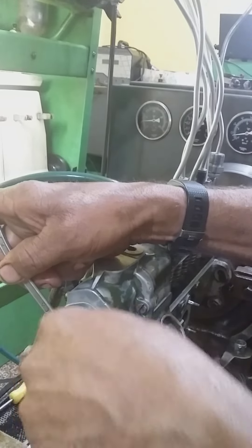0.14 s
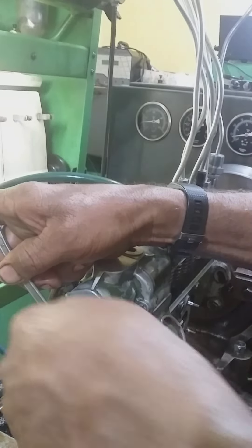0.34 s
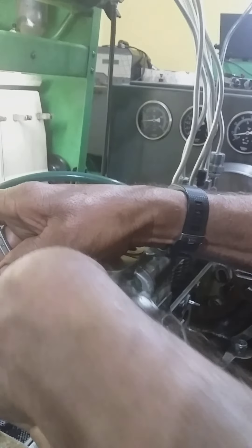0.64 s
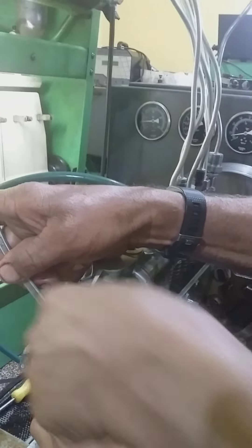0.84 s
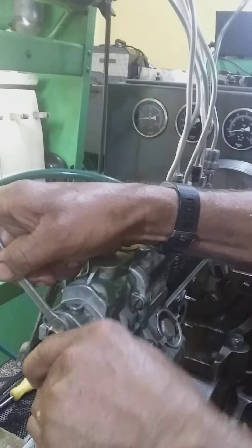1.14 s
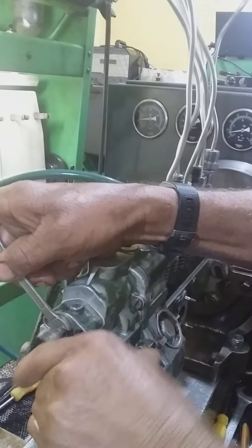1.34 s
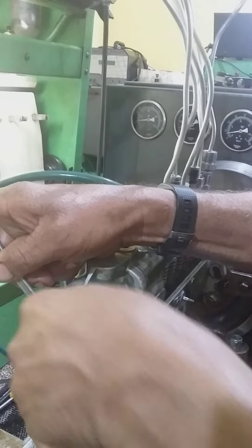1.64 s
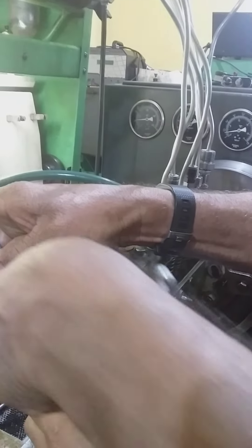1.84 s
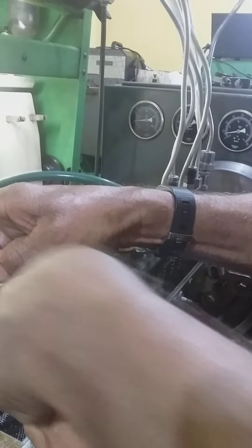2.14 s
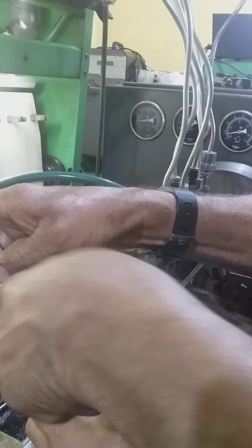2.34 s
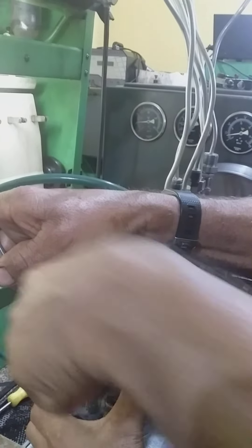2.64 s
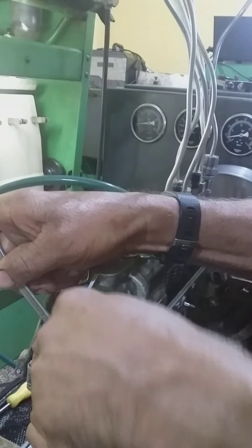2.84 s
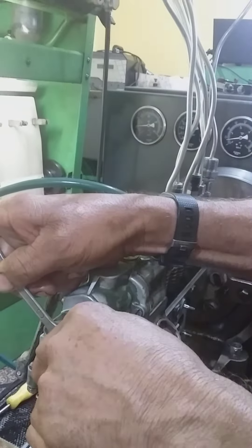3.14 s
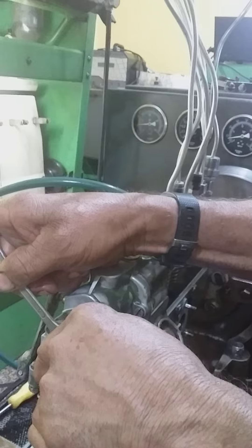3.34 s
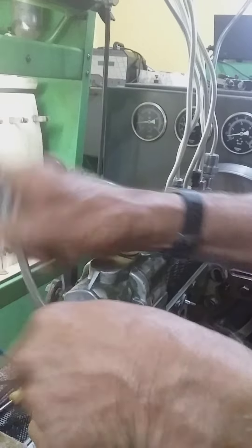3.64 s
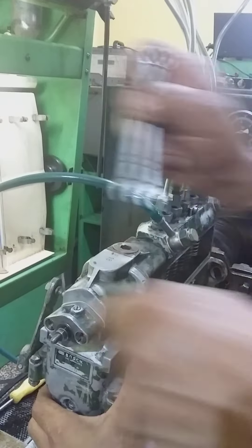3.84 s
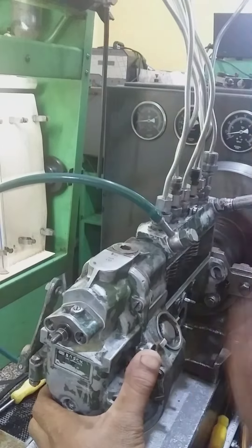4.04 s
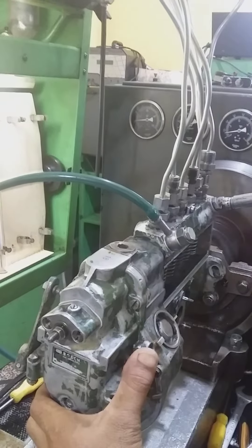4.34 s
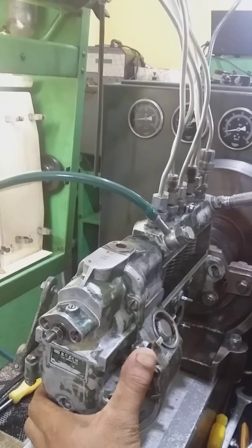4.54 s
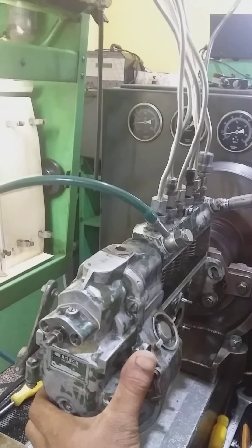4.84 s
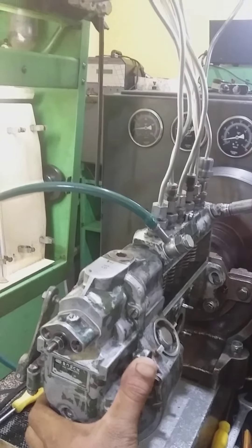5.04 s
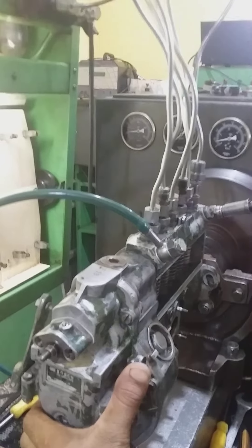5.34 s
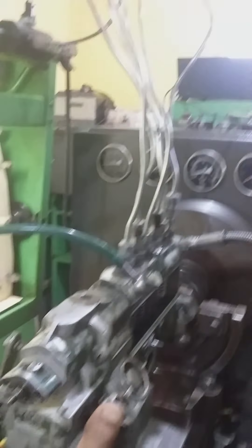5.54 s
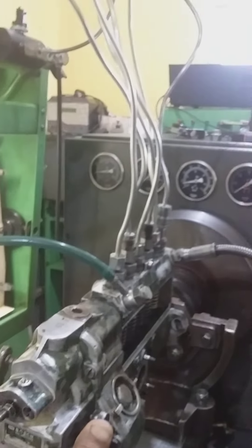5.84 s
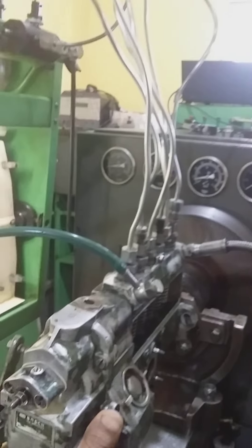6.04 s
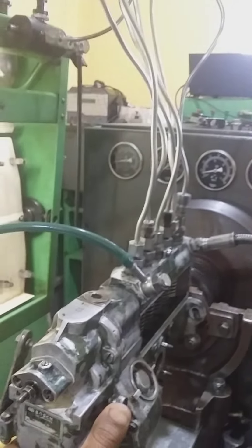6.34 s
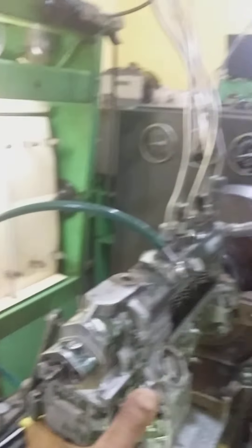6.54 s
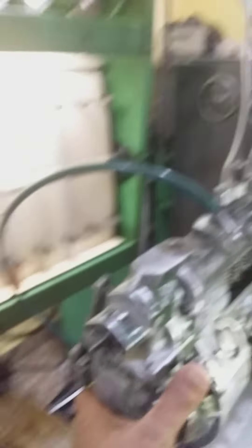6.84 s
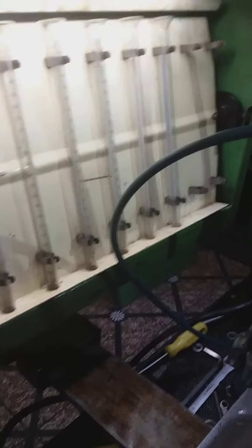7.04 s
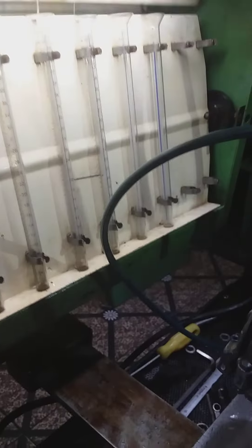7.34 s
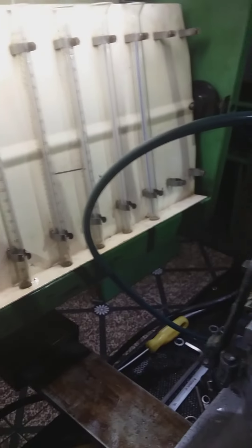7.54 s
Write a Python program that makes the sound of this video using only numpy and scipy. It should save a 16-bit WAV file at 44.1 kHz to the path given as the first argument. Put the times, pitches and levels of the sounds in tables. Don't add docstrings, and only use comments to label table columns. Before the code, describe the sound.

In a workshop, a fuel injection pump runs close to the microphone on a steel bench. A low booming hum carries rumble, fast plunger clatter and bright hiss. Every second or so the drive sags in pitch and recovers. Just past halfway a spanner lands with a sharp clank, thud and short high ringing. The clatter recedes slightly, returns, cuts to silence for an instant, then resumes to the end.

```python
import sys
import numpy as np
from scipy import signal
from scipy.io import wavfile
from scipy.ndimage import uniform_filter1d

SR = 44100
rng = np.random.default_rng(int(sys.argv[2]) if len(sys.argv) > 2 else 0)


def linear_from_db(decibels):
    return 10 ** (np.asarray(decibels, float) / 20)


def file_out(sig):
    cols = np.atleast_2d(sig).T
    lim = np.clip(cols, -1, 1)
    pcm = np.round(lim * 32767).astype(np.int16)
    wavfile.write(sys.argv[1], SR, pcm)


N = 338688
T = np.arange(N) / SR

# multiple, level_db
INJECTION_ORDERS = [(1, -26.5), (2, 0), (3, -14.5), (4, -10.5), (5, -10.5), (6, -40), (7, -24.5), (8, -19),
                    (9, -19), (10, -14.5), (11, -16), (12, -29), (13, -20.5), (14, -24.5)]
# pitch_hz, level_db (per Hz)
BENCH_RUMBLE = [(18, -66), (30, -38), (60, -29), (100, -34), (114, -14), (150, -8), (180, -6), (215, -6),
                (278, -13), (340, -13), (402, -10), (520, -26), (700, -26), (1000, -50)]
# pitch_hz, level_db (per Hz)
HOUSING_COLOUR = [(260, -44.0), (450, -5.0), (579, -11.5), (801, -0.5), (971, -6.5), (1130, -1.5),
                  (1300, -3.5), (2220, -2), (2430, 3.0), (2980, -4.5), (5890, -1), (9050, -3.5),
                  (11600, -1), (15400, -19)][:-1] + [(17000, -3)]
HOUSING_RING_HZ = (799, 1055, 1150, 1400, 1820, 2480, 4200, 5435, 5725, 5955, 5900, 10300, 11380, 11680)
# width_hz, level_db
HOUSING_RING_SHAPE = [(20.4, -8.5), (40, 5.5), (131, 0.5), (30, 1.5), (250, 3.5), (250, -3), (600, 4.5),
                      (29, 4), (29.8, 1), (35, 6), (696, 4), (245, 3.5), (250, 5), (297, 8.5)]
# spurt_db, late_strokes, knock_db, knock_ring_hz, tick_db
PLUNGER_HABITS = [
    (0.5, 0.008, -3, 2520, -2.5),
    (-17.5, .02, -0.5, 1147, 0),
    (3, 0.025, -3.5, 2050, 4),
    (-2, 0.015, -3.5, 1180, -24),
    (-22, 0.0069, -2.5, 1930, 0.5),
    (-11, 0.015, -2.5, 2400, -6),
]
# start_s, sink_s, held_s, hum_sag_hz
DRIVE_LOADS = [
    (-0.189, 0.122, 0.07, 5.82),
    (0.45, 0.235, 0.008, 18.932),
    (1.524, 0.399, -0.002, 5.983),
    (2.393, 0.222, 0.276, 3.477),
    (3.22, 0.257, -0.002, 18.988),
    (4.49, 0.02, 0.17, 6.8),
    (5.2, 0.095, 0.353, 3.981),
    (6.034, 0.169, 0.065, 17.651),
    (7.192, 0.361, -0.0, 7.001),
]
# pitch_hz, width_hz, level_db, phase_rad
BENCH_PANELS = [
    (162.9, 3.73, 1, 3),
    (147, 2.6, -7, -2),
]
SPANNER_LOW_HZ = dict(a=4613, b=6315, c=7276, d=7604, e=8025, f=10266, g=10307, h=11391, i=11620, j=11763)
SPANNER_HIGH_HZ = dict(k=12188, l=12290, m=12823, n=12974, o=13215, p=13624, q=14316, r=15181)
# start_s, mode, level_db, contact_s
SPANNER_RINGS = [(4.083, "i", -34, .006), (4.093, "m", -27, .006), (4.098, "j", -25, .013),
                 (4.503, "p", -26, .012), (4.503, "h", -21, .01), (4.503, "f", -26, .02),
                 (4.503, "k", -25, .01), (4.503, "n", -25, .01), (4.503, "r", -28, .011),
                 (4.522, "q", -27, .006), (4.518, "e", -24, .022), (4.512, "d", -30.5, .085),
                 (4.518, "c", -32.5, .033), (4.522, "b", -23, .005), (4.536, "j", -27, .012),
                 (4.550, "j", -21, .055), (4.555, "e", -28, .012), (4.560, "f", -32.5, .02),
                 (4.572, "o", -21, .022), (4.598, "o", -29, .1), (4.538, "p", -25, .09),
                 (4.646, "p", -29, .04), (4.565, "m", -34, .13), (4.560, "a", -31, .08),
                 (4.575, "q", -39, .055), (4.597, "c", -30, .027), (4.610, "l", -33, .08),
                 (4.624, "g", -18, .034), (4.686, "g", -33, .01), (4.672, "j", -28, .028)]
# start_s, click_db, thud_db, thud_top_hz, length_s
BENCH_BUMPS = [
    (0.398, -60, -32, 123, 0.069),
    (3.218, -60, -45, 60, .08),
    (4.505, -36, -24.5, 500, .012),
    (4.529, -22, -31, 900, 0.011),
    (4.52, -60, -19.5, 140, 0.024),
    (4.54, -35, -17.5, 1290, 0.0054),
    (4.559, -36, -33, 1000, .008),
    (4.605, -24, -40, 400, 0.012),
    (6.50, -52, -41, 60, .06),
    (7.615, -54, -54, 90, 0.05),
]
# start_s, clatter_db
MIC_NEARNESS = [(0.0, -19.5), (0.36, -19.5), (0.6, -20.5), (1.91, -21), (3.16, -19.5), (3.47, -19.5),
                (3.88, -20), (4.3, -19), (4.75, -23.5), (5.34, -27), (5.76, -25), (6.04, -21), (6.8, -20)]
# start_s, end_s
SILENT_GAP = (6.9635, 7.0815)

FREE_HZ = 163.49
CATCH_S, SETTLE_HZ, SETTLE_S = .183, 9.8, .193
JUMP_S = 4.499
AFTER_DB = -19
FIZZ_DB, FIZZ_FOLLOW = -7, -0.14
DRONE_DB, DRONE_FOLLOW = -5.5, 0.14
RISE_SHARE, DAMPED_S, RING_PER_CONTACT = .15, .035, 1.0
SLIPS, SPURT_LEAD = [-.075, .032, 2.364], .42
KNOCK_RING = .6
EDGE_HZ = 15760


def evened(x):
    return x / np.sqrt(np.mean(x ** 2) + 1e-20)


def colour(x, points, rings=()):
    hz = np.fft.rfftfreq(16384, 1 / SR)
    point_hz, point_db = np.transpose(points)
    db = np.interp(np.log(hz + 1), np.log(point_hz + 1), point_db)
    db = db + sum(top_db / (1 + (2 * (hz - ring_hz) / width) ** 2) for ring_hz, width, top_db in rings)
    log_gain = np.log(linear_from_db(np.maximum(db, -100)))
    circle = np.concatenate([log_gain, log_gain[-2:0:-1]])
    taps = np.fft.ifft(np.exp(np.conj(signal.hilbert(circle)))).real[:8192]
    return signal.oaconvolve(x, taps)[:N]


def drift(per_s):
    knots = rng.standard_normal(N // 64 + 2)
    smooth = signal.lfilter([1], [1, -np.exp(-2 * np.pi * per_s * 64 / SR)], knots)
    smoother = uniform_filter1d(smooth, size=9)
    return evened(np.interp(np.arange(N), np.arange(len(smooth)) * 64, smoother))


def speed():
    hz = np.full(N, float(FREE_HZ))
    for start, sink, held, sag_hz in DRIVE_LOADS:
        down = np.clip((T - start) / sink, 0, 1)
        after = np.maximum(T - start - sink - held, 0)
        last_hz = min(sag_hz, SETTLE_HZ)
        creep = last_hz * np.exp(-after / SETTLE_S)
        climb = (sag_hz - last_hz) * np.exp(-(after / CATCH_S) ** 2)
        hz = hz - (creep + climb) * np.sin(np.pi / 2 * down) ** 2
    return hz


def drone(strokes, hum_hz, waver_db=2, boom_db=4):
    wander, sag_db, lope_db, rumble_db = .065, .06, -2, -6
    lines = 0
    sag_hz = hum_hz.max() - hum_hz
    for k, db in INJECTION_ORDERS:
        boom = boom_db / (1 + ((k * hum_hz / 2 - HOUSING_RING_HZ[0]) / 8.6) ** 2)
        waver = min(k, 3) / 3 * waver_db * drift(1.36)
        sag_loss = min(k + 3, 8) * sag_db * sag_hz
        level_db = db + boom + waver - sag_loss
        phase = 2 * np.pi * (k * strokes + rng.random()) + k * wander * drift(18.0)
        lines += (k != 2) * linear_from_db(level_db) * np.sin(phase)
    turn = np.diff(np.floor(strokes / 6), prepend=0)
    stamp = rng.standard_normal(10000) * np.hanning(10000)
    lope = colour(signal.oaconvolve(turn, stamp)[:N], BENCH_RUMBLE)
    rumble = colour(rng.standard_normal(N), BENCH_RUMBLE)
    return evened(evened(lines) + linear_from_db(lope_db) * evened(lope) + linear_from_db(rumble_db) * evened(rumble))


def hum(strokes, slip):
    out, cut = 0, round(JUMP_S * SR)
    for hz, width, db, phase in BENCH_PANELS:
        decay = np.exp(-np.pi * width / SR)
        turn = np.exp(2j * np.pi * hz * T)
        drive = np.exp(4j * np.pi * strokes) / turn
        parts = [signal.lfilter([1 - decay], [1, -decay], part) for part in (drive[:cut], drive[cut:])]
        out = out + linear_from_db(db) * np.exp(1j * phase) * turn * np.concatenate(parts)
    return np.sqrt(2) * (out * np.exp(4j * np.pi * slip)).real


def spanner():
    out, t = np.zeros(N + SR), np.arange(SR // 2) / SR
    modes = {**SPANNER_LOW_HZ, **SPANNER_HIGH_HZ}
    for start, mode, db, held in SPANNER_RINGS:
        rise, t60 = RISE_SHARE * held, DAMPED_S + RING_PER_CONTACT * held
        shape = np.clip(t / rise, 0, 1) * linear_from_db(db - 60 * np.maximum(t - held, 0) / t60)
        rocking = evened(uniform_filter1d(rng.standard_normal(len(t)), size=250))
        tone = np.sqrt(2) * np.sin(2 * np.pi * modes[mode] * (t + start))
        out[round(start * SR):][:len(t)] += shape * linear_from_db(1.2 * rocking) * tone
    for start, click_db, thud_db, thud_hz, length in BENCH_BUMPS:
        fade = (t / length) ** .5 * np.exp(-2 * t / length) * 3
        click = linear_from_db(click_db) * np.diff(rng.standard_normal(len(t) + 1))
        dull = signal.butter(2, [thud_hz / 5, thud_hz], "band", fs=SR)
        thud = linear_from_db(thud_db) * evened(signal.lfilter(*dull, rng.standard_normal(len(t))))
        out[round(start * SR):][:len(t)] += fade * (click + thud)
    return out[:N]


def spurts(strokes, fall=0.17, spread_db=1.5, second=0.028):
    rise = .15
    count = np.floor(strokes).astype(int)
    luck = rng.standard_normal((count[-1] + 2, 2))
    db, late = np.transpose(PLUNGER_HABITS)[:2, count % 6]
    u = strokes % 1 - .08 - late - 0.0098 * luck[count, 1]

    def bump(v):
        return np.clip(v / rise, 0, 1) * np.exp(-np.maximum(v - rise, 0) / fall)

    return linear_from_db(db + spread_db * luck[count, 0]) * (bump(u) + second * bump(u - .5))


def clatter(strokes, fizz_db, steady=0.99, knock_db=-4, tick_db=-7, fizz_steady=0.42, patchy_db=0.26):
    gate = spurts(strokes)
    count = np.floor(strokes - .1).astype(int) + 1
    strength = linear_from_db(1.96 * rng.standard_normal(count[-1] + 2))
    marks = np.diff(count, prepend=0) * strength[count]
    n = np.arange(1500)
    fade = n / (n + 51.0) * np.exp(-n / 340.0)
    knocks, ticks = 0, 0
    for k, (_, _, db, hz, high_db) in enumerate(PLUNGER_HABITS):
        own_marks = marks * (count % 6 == k)
        dull = evened(signal.lfilter(*signal.butter(1, 4500, fs=SR), rng.standard_normal(1500)))
        knock = linear_from_db(db) * fade * (dull + KNOCK_RING * np.sin(2 * np.pi * hz * n / SR))
        knocks += signal.oaconvolve(own_marks, knock)[:N]
        ticks += signal.oaconvolve(own_marks, linear_from_db(high_db) * fade)[:N]
    hiss = rng.standard_normal(N) * linear_from_db(patchy_db * drift(2.7))
    body = evened(hiss * (steady + gate)) + linear_from_db(knock_db) * evened(knocks)
    top = evened(hiss * (fizz_steady + gate + linear_from_db(tick_db) * evened(ticks)))
    low, high = (signal.butter(4, 7500, kind, fs=SR, output="sos") for kind in ("low", "high"))
    rings = [(hz, *shape) for hz, shape in zip(HOUSING_RING_HZ, HOUSING_RING_SHAPE)]
    body = evened(signal.sosfilt(low, colour(body, HOUSING_COLOUR, rings)))
    fizz = evened(signal.sosfilt(high, colour(top, HOUSING_COLOUR, rings)))
    return body + linear_from_db(fizz_db) * fizz


def pump():
    hum_hz = speed()
    near_db = np.where(T < SILENT_GAP[1], np.interp(T, *np.transpose(MIC_NEARNESS)), AFTER_DB)
    away_db = near_db - AFTER_DB
    turned = np.cumsum(hum_hz) / (2 * SR)
    slip = np.array(SLIPS)[1 * (T > JUMP_S) + (T > np.mean(SILENT_GAP))]
    strokes = turned + slip + SPURT_LEAD
    background = linear_from_db(DRONE_DB + DRONE_FOLLOW * away_db) * drone(strokes, hum_hz)
    plungers = clatter(strokes, FIZZ_DB + FIZZ_FOLLOW * away_db)
    return linear_from_db(near_db) * (background + hum(turned, slip) + plungers)


def scene():
    duck = 1 - .6 * np.exp(-((T - JUMP_S) / .0022) ** 2)
    return (pump() * duck + spanner())[None]


def roll_off(x):
    return signal.sosfilt(signal.butter(12, 16900, fs=SR, output="sos"), x)


def record(dry):
    cut = signal.sosfilt(signal.butter(2, 60, "high", fs=SR, output="sos"), dry)
    live = np.clip(np.maximum(SILENT_GAP[0] - T, T - SILENT_GAP[1]) * 1000, 0, 1)
    edge = signal.firwin(2047, EDGE_HZ, window=("kaiser", 10), fs=SR)
    mix = signal.oaconvolve(cut * live, edge[None], "same")
    return roll_off(mix)


dry = scene()
out = record(dry)
file_out(out)
```